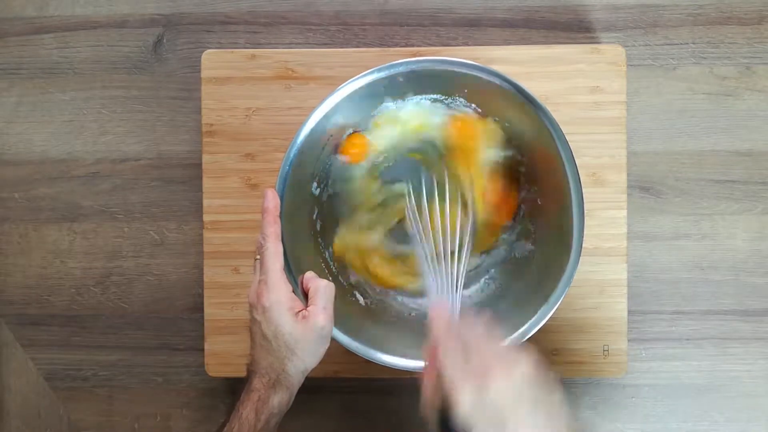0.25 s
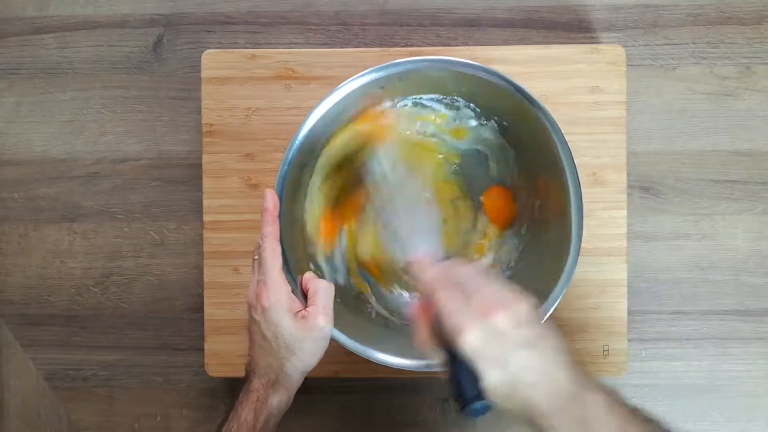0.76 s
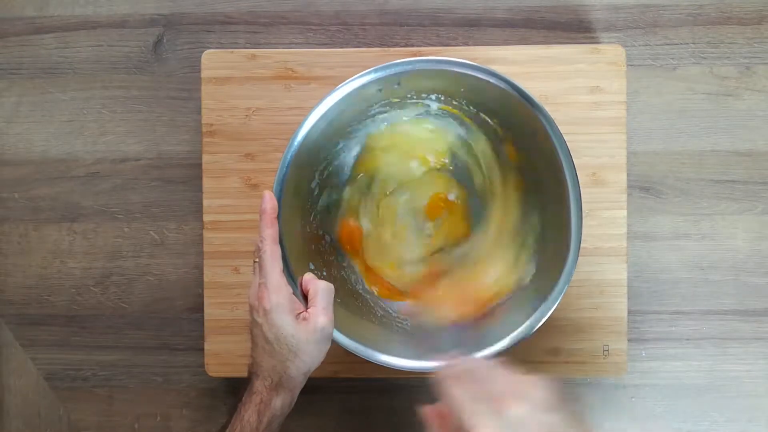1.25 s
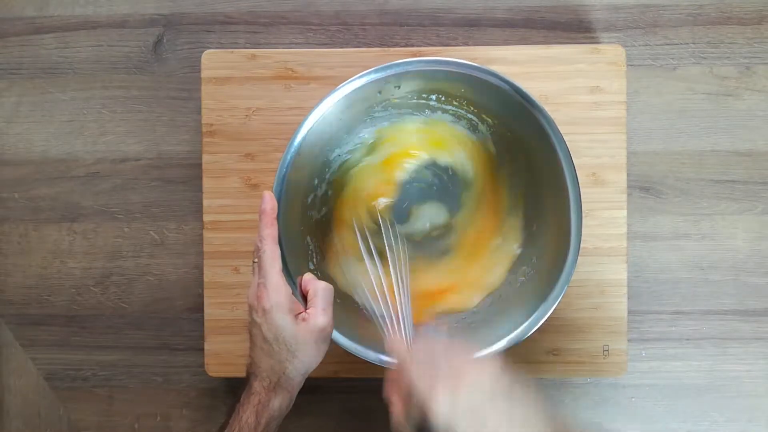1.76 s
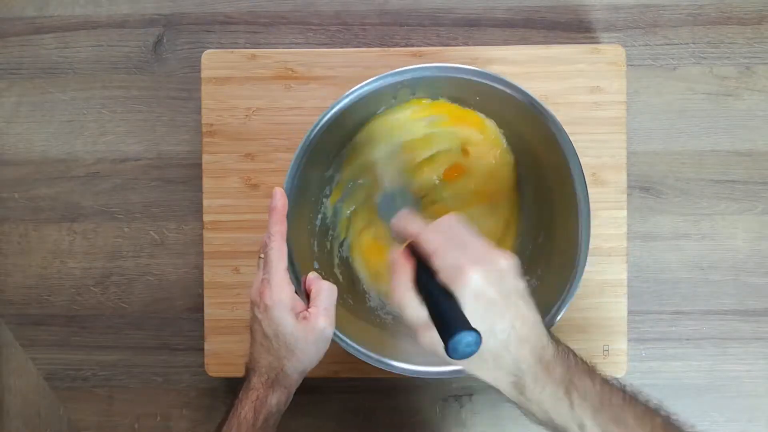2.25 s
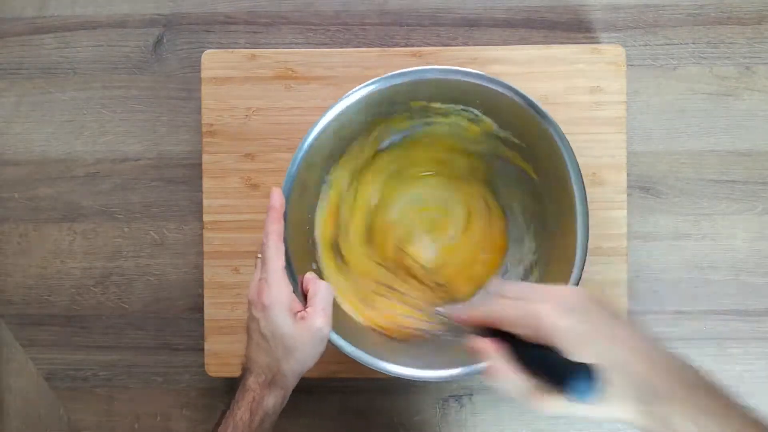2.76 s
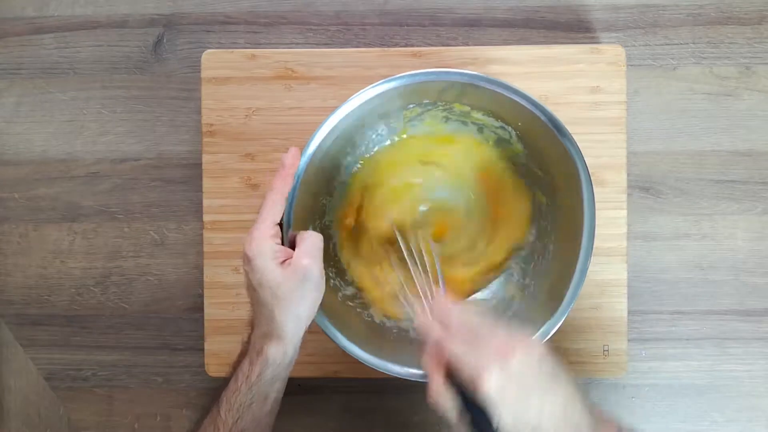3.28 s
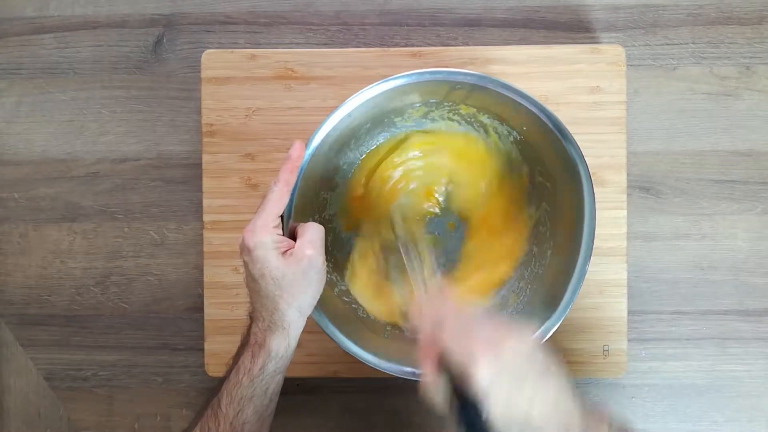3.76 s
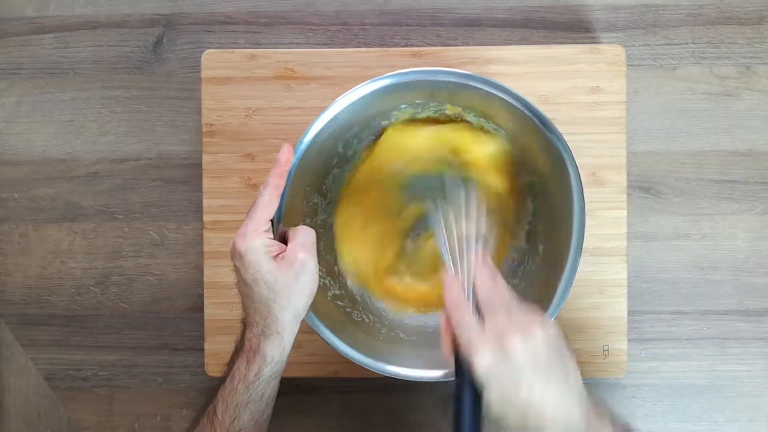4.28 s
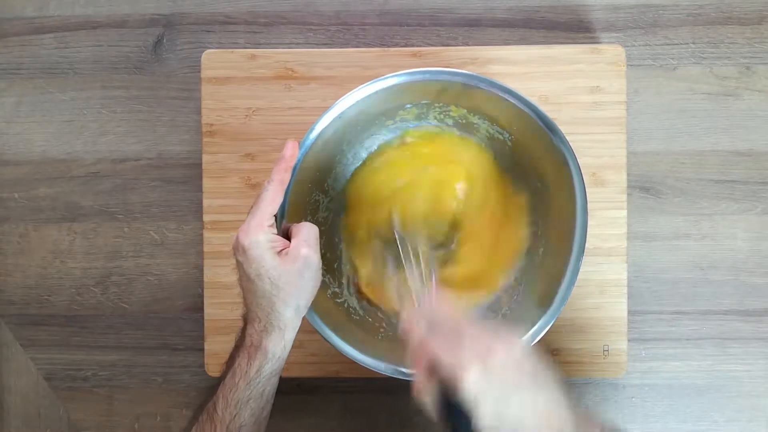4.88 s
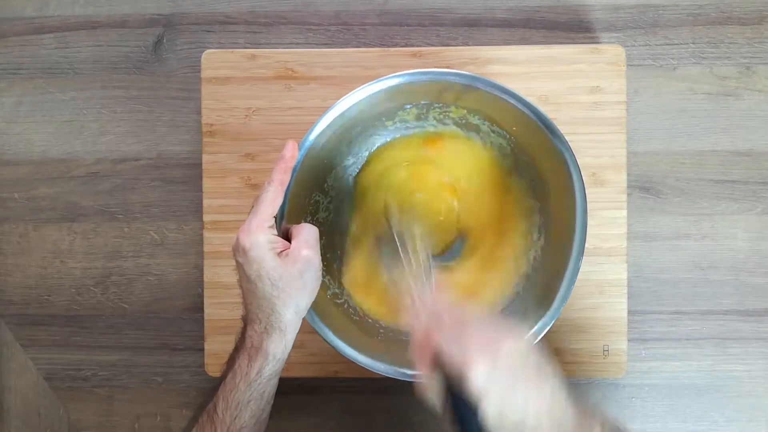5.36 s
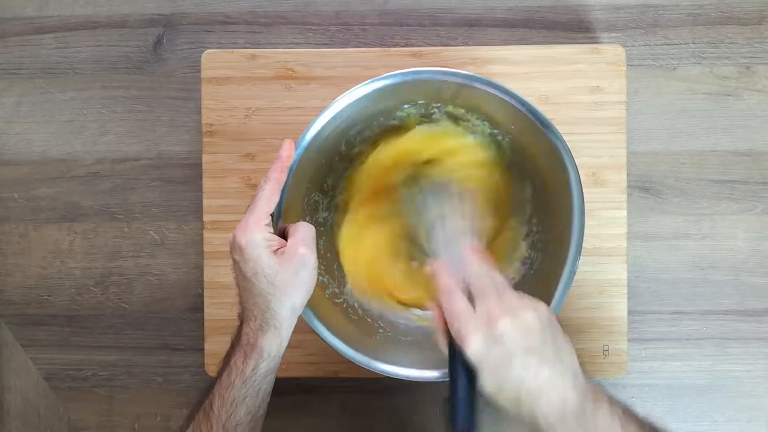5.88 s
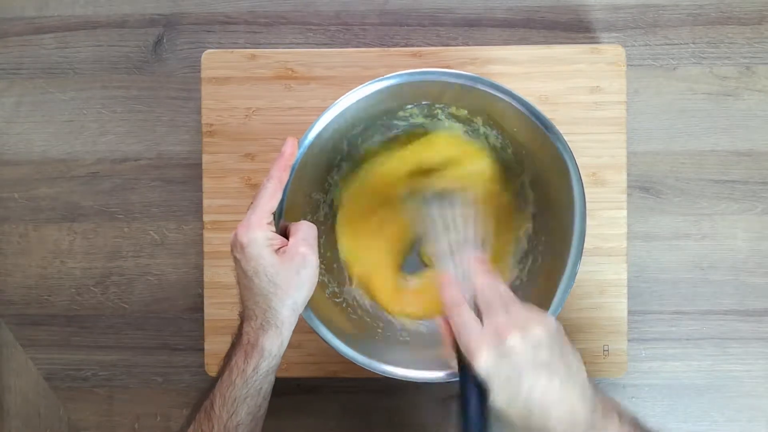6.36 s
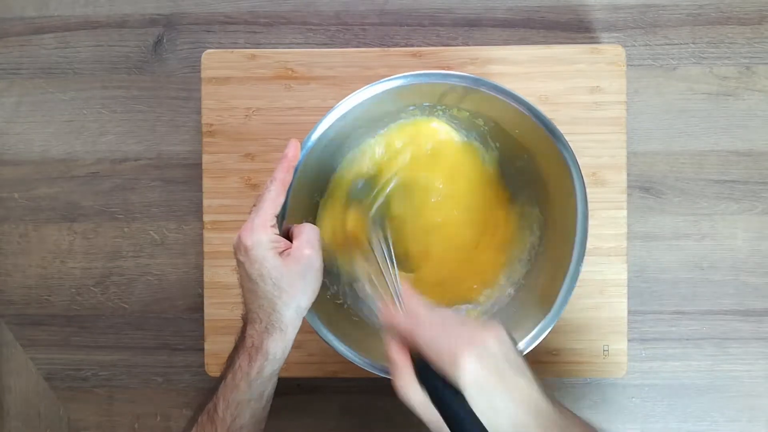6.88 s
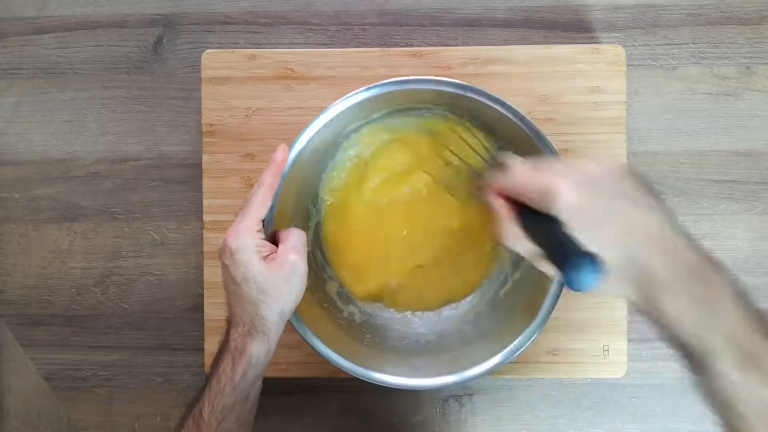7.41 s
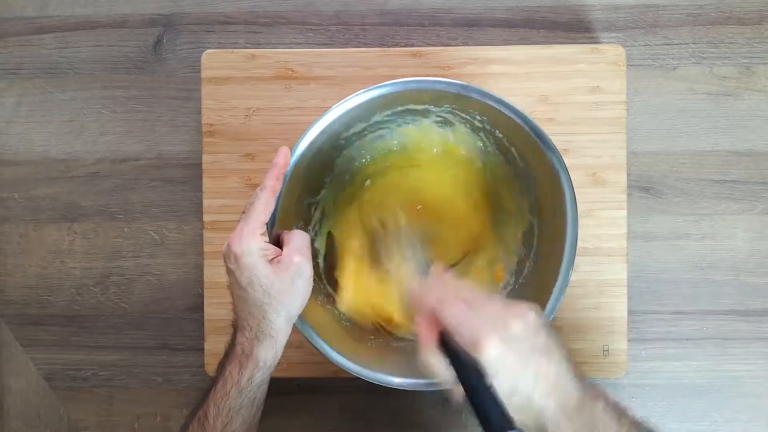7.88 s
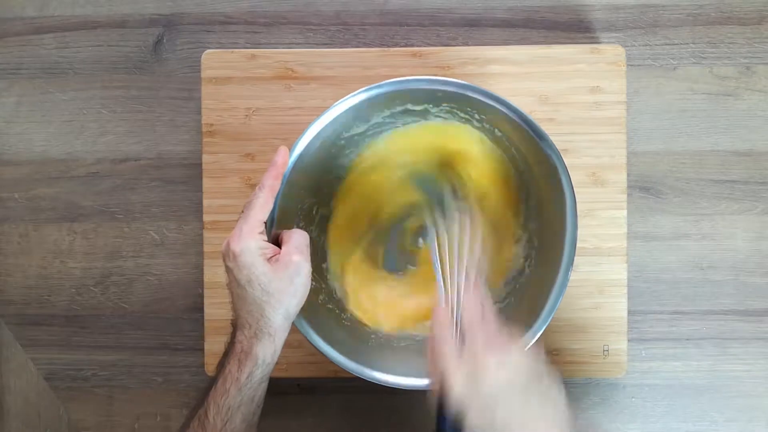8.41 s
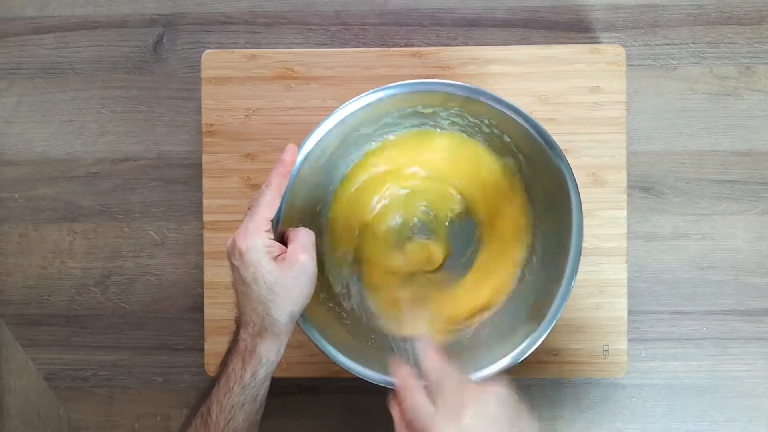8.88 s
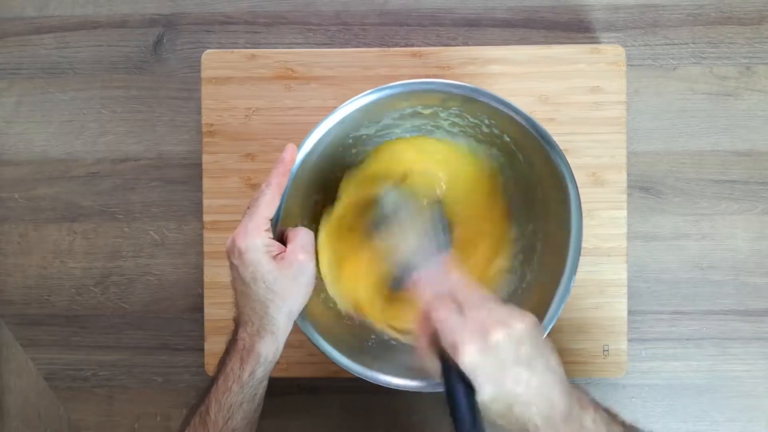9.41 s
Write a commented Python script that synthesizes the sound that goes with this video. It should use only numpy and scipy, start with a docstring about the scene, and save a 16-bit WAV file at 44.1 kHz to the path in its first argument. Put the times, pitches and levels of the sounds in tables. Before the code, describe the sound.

In a quiet, slightly echoing kitchen, a whisk works rapidly in a metal bowl near the microphone. Thin wires clatter and scrape throughout, mixed with squelching, hissing egg. Early strokes ring on bare steel over low worktop rumbles and thuds; midway the tone grows wetter and duller, then air pockets plop and sharper knocks strike the wall.

```python
"""A wire whisk beats eggs in a steel bowl on a wooden board in a kitchen, heard close up in stereo.
From the first stroke the wires skitter over the wet bottom and rasp up the bare wall, amid pops and hiss of egg.
Up to about 4 s dull thuds jar the board over a rumbling worktop; by 4.5 s egg coats and dulls the bottom.
From 6 s big air pockets plop; near 8 s hard knocks on the wall ring out and the worktop shakes again.
Contacts are click trains through bowl resonances and room echoes; egg is ringing pops and filtered noise."""
import sys
import numpy as np
from scipy import signal
from scipy.fft import rfft, irfft
from scipy.io import wavfile
from scipy.ndimage import uniform_filter1d

SR = 44100
rng = np.random.default_rng(int(sys.argv[2]) if len(sys.argv) > 2 else 0)


def wav_record(signal):
    """Record a signal, one row per channel, as 16-bit PCM in the file named by sys.argv[1]."""
    frames = np.transpose(np.atleast_2d(signal))
    bounded = np.clip(frames, -1, 1)
    # unit amplitude maps onto the largest positive 16-bit level
    quanta = np.round(bounded * 32767).astype(np.int16)
    wavfile.write(sys.argv[1], SR, quanta)


N = 425565
TIME = np.arange(N) / SR
TAIL = np.arange(2 ** 14) / SR   # seconds along a response
HZ = np.fft.rfftfreq(len(TAIL), 1 / SR)

# All levels are relative, ahead of the trims in the mix.
# colour of the quiet kitchen air: pitch_hz, density_db (per Hz)
AIR_COLOUR = [(30, -25), (150, -28), (500, -4), (1500, -7), (4500, -2), (9000, -18), (16000, -29)]
# rumble of the shaken worktop: pitch_hz, density_db (per Hz)
WORKTOP_COLOUR = [(20, -40), (31, -43), (40, -2), (49, 6), (60, 1.5), (70, -0.5), (88, -18.5), (140, -25.5),
                  (300, -24), (1500, -84)]
# how strongly the worktop shakes: time_s, level_db
WORKTOP_SHAKE = [(0.0, -58), (0.78, -70), (0.83, -57.5), (1.93, -53.5), (2.04, -72.5), (2.66, -45),
                 (2.82, -62.5), (3.52, -44.5), (3.89, -61), (4.3, -45.5), (4.41, -60.5), (7.87, -55.5),
                 (7.96, -40.5), (8.12, -61), (8.65, -53), (8.68, -44), (8.76, -56), (9.65, -56.5)]
# dull thuds of the board: start_s, level_db
BOARD_THUDS = [(.019, -48), (.121, -48), (0.869, -37.5), (1.181, -44.5), (1.469, -45.5), (1.755, -37),
               (1.855, -43), (2.506, -34), (2.645, -44.5), (3.028, -35.5), (3.554, -38.5), (4.234, -43)]
# colour of a thud: pitch_hz, density_db (per Hz)
THUD_COLOUR = [(20, -6), (55, 1), (95, -5), (135, 1.5), (270, -1.5), (350, -7.5), (600, -24), (2000, -65)]
# modes of the board under the bowl: pitch_hz, width_hz, level_db (over the thud colour)
BOARD_MODES = [(131, 6, 9), (241, 10, 9.5)]
# fizz of flung egg: pitch_hz, density_db (per Hz)
SPRAY_COLOUR = [(1000, -22), (5000, 7), (9000, 2), (16000, -3)]
# big air pockets bursting in the egg: start_s, level_db, pitch_hz (at the start)
EGG_PLOPS = [(6.049, -34, 990), (6.294, -41.5, 730), (6.521, -42.5, 713), (6.766, -43, 499),
             (6.983, -41.5, 505), (7.927, -35, 1060), (9.324, -32, 938)]
# contact noise on the wet bottom: pitch_hz, density_db (per Hz)
BOTTOM_COLOUR = [(120, -26.5), (330, -22), (520, -12.5), (790, -18), (980, -3), (1700, 4), (2700, 6.5),
                 (3600, 3.5), (5000, 3), (6500, -12.5), (9000, -13.5), (16000, -17.5)]
# bowl modes damped by egg and hand: pitch_hz, width_hz, level_db (over the contact noise)
BOWL_MODES = [(237.6, 12, 14.5), (515, 23, 11), (740, 31, 18), (920, 94, 10.5), (1179, 10, 9.5),
              (1404, 13.6, 9), (1620, 39, 5), (1867, 21, 5), (2170, 100, 0), (3590, 110, 4.5)]
# contact noise on the bare wall: pitch_hz, density_db (per Hz)
WALL_COLOUR = [(300, -30.5), (1200, -33), (2650, -22), (2950, -3), (4200, 1), (5400, 2), (6800, -2.5),
               (9000, -18.5), (16000, -29.5)]
# resonances of the upper wall: pitch_hz, width_hz, level_db (over the contact noise)
WALL_MODES = [(530, 44, 18.5), (1080, 62, 27.5), (1590, 52, 11)]
# ring of steel not yet coated by egg: pitch_hz, t60_s, level_db
BARE_STEEL_RING = [(525, 0.044, -13), (1410, 0.16, -15), (1570, 0.028, -14.5), (1634, 0.068, -13.5),
                   (3485, 0.045, -16), (3630, 0.073, -10.5), (3760, 0.081, -15)]
# how bare of egg the bottom is: time_s, level_db
BOTTOM_BARENESS = [(0, -1.5), (2.6, 1), (4.5, -12.5), (7.2, -11), (9.6, -5.5)]
# wires singing as they slip on the wall: pitch_hz, t60_s, level_db
WIRE_RING_MODES = [(3214, 0.32, -18), (3910, 0.078, -15.5), (4410, 0.036, -10), (4311, 0.09, -18.5),
                   (5080, 0.13, -19.5)]
# left-right balance of the bowl: pitch_hz, left_minus_right_db
BOWL_LEAN = [(100, 7), (300, -3.5), (1000, -1.5), (2000, -0.5), (4300, -5), (6000, -6), (8000, 5.5),
             (15000, 2)]
# how differently echoes reach the two sides: pitch_hz, side_minus_mid_db
ECHO_WIDTH = [(150, -43), (500, 3.5), (1000, -2.5), (2000, -3.5), (4000, 2)]
# pushes of the whisk, about five a second: start_s, push_s, drag_s (after it), bottom_db, wall_db
WHISK_STROKES = [(0, 0.059, 0.076, -46.5, -44.5), (.08, 0.096, 0.28, -42, -41.5),
                 (.26, 0.22, 0.065, -45.5, -41.5), (.455, 0.097, 0.45, -41, -38.5),
                 (.68, 0.14, 0.059, -45, -41.5), (0.872, 0.19, 0.14, -50, -41.5),
                 (1.006, 0.22, 0.1, -46, -46), (1.31, 0.19, 0.055, -45, -40), (1.6, 0.12, 0.95, -44, -45),
                 (1.86, 0.11, 0.31, -41.5, -39), (2.09, 0.17, 0.22, -43, -44),
                 (2.294, 0.19, 0.029, -45, -44), (2.59, 0.016, 0.11, -47.5, -37.5),
                 (2.675, 0.13, 0.15, -50.5, -37.5), (2.886, 0.046, 0.092, -46, -51),
                 (3.077, 0.032, 0.1, -47.5, -40.5), (3.189, 0.044, 0.1, -45.5, -49),
                 (3.345, 0.073, .1, -50, -62), (3.475, 0.086, 0.24, -47, -45),
                 (3.68, 0.071, 0.24, -43.5, -40.5), (3.84, 0.15, 0.43, -43.5, -41),
                 (4.05, 0.23, 0.3, -45, -42.5), (4.29, 0.26, 0.14, -45.5, -42),
                 (4.59, 0.047, 0.25, -39, -37.5), (4.815, 0.059, 0.1, -40.5, -36),
                 (4.95, 0.056, .05, -44, -37.5), (5.04, 0.064, 0.2, -40.5, -36.5),
                 (5.275, 0.07, 0.14, -42, -36.5), (5.5, 0.064, 0.17, -44, -36),
                 (5.728, 0.072, 0.073, -37, -35), (5.87, 0.058, 0.16, -44.5, -43.5),
                 (5.975, 0.085, 0.45, -41, -42.5), (6.21, 0.074, 0.16, -45, -41),
                 (6.425, 0.063, 0.18, -39.5, -38), (6.65, 0.1, 0.34, -40.5, -38.5),
                 (6.885, 0.054, 0.1, -41, -34.5), (7.03, 0.11, 0.12, -45, -42.5),
                 (7.235, 0.077, 0.082, -45, -33), (7.36, 0.069, 0.13, -46.5, -36.5),
                 (7.695, 0.21, 0.079, -49.5, -30), (7.914, 0.084, 0.22, -43.5, -40.5),
                 (8.08, 0.13, 0.24, -50.5, -44), (8.215, 0.14, 0.17, -43, -44),
                 (8.42, 0.07, 0.61, -39, -37.5), (8.655, 0.063, 0.28, -38, -38),
                 (8.85, .09, 0.23, -38.5, -38), (9.085, 0.042, 0.52, -41.5, -38.5),
                 (9.2, 0.034, 0.14, -48, -35), (9.3, 0.053, 0.23, -40, -43), (9.489, 0.14, .2, -41, -45.5)]
# hard knocks of whisk on steel: start_s, chatter_s, bottom_db, wall_db
WHISK_KNOCKS = [(.346, 0.01, -28, -28), (0.698, 0.012, -39, -29), (0.771, 0.015, -37, -58),
                (1.125, 0.014, -37.5, -51), (1.342, 0.0097, -52, -30.5), (1.734, 0.007, -34, -54),
                (2.058, 0.013, -33, -44), (2.3, 0.0066, -30.5, -34), (2.333, 0.016, -53, -23),
                (2.681, 0.0044, -53, -28), (2.776, 0.0099, -47, -43), (2.889, 0.0085, -40, -30.5),
                (3.476, 0.0053, -37, -40), (3.499, 0.0052, -34, -29.5), (3.78, 0.0037, -29, -44),
                (3.854, 0.0056, -37, -26.5), (4.148, 0.026, -39, -34.5), (4.644, 0.0042, -29.5, -34),
                (4.745, 0.0085, -47, -32.5), (5.152, 0.0031, -28.5, -26), (5.277, 0.0088, -37, -39),
                (5.344, 0.0028, -50, -47), (5.909, 0.0066, -35, -57), (5.978, 0.019, -33.5, -33),
                (6.213, 0.0084, -31.5, -32.5), (6.59, 0.014, -48, -33), (6.747, 0.0044, -30, -38),
                (6.913, 0.0039, -42, -35), (7.023, 0.0073, -35, -34), (7.053, 0.0036, -56, -31),
                (7.088, 0.0053, -45, -27.5), (7.15, 0.0044, -41, -51), (7.269, 0.037, -59, -30),
                (7.361, 0.0058, -48, -27), (7.444, 0.0077, -39.5, -31.5), (7.642, 0.051, -46, -41.5),
                (7.754, 0.0046, -45, -28.5), (7.804, 0.0059, -39.5, -24.5), (7.854, 0.015, -60, -19.5),
                (7.936, 0.0022, -41, -20), (8.307, 0.0042, -29.5, -37), (8.39, 0.009, -36.5, -48),
                (8.659, 0.013, -29.5, -36), (9.092, 0.01, -31, -52), (9.218, 0.011, -56, -29),
                (9.329, 0.0069, -30, -47), (9.499, 0.029, -31.5, -36), (9.626, .023, -48, -21)]

ROOM_T60_S, ROOM_DB = 0.35, -7.5   # kitchen reverberation; level against the bowl's ring
CUTOFF_HZ = 15900
THUD_RISE_S = 0.0035   # the hand cushions each thud
PLOP_DB, PLOP_CYCLES = 0.5, 71   # trim, and cycles for a plop to fall 60 dB
FULL_SPRAY_DB, SPRAY_LOSS = -39.5, 1.0   # strokes lighter than this on the bottom fling less egg (dB per dB)
ATTACK_SHARE = 0.25   # share of a push in which it swells
RELEASE_S, DRAG_DB = 0.013, -5   # letting go, then a lighter drag against the push
# loose wires tap at random: rate, level against the stroke, spread, chatter
TAPS_PER_S, TAP_DB, TAP_SPREAD_DB, TAP_S = 16, 2.5, 3, 0.0037


def from_db(db):
    """Decibels to gain."""
    return 10 ** (np.asarray(db) / 20)


def rms_one(x):
    """Scale to an rms of 1."""
    return x / np.sqrt(np.mean(x ** 2) + 1e-20)


def unit(x):
    """Scale each channel to an energy of 1."""
    return x / np.sqrt(np.sum(x ** 2, axis=-1, keepdims=True) + 1e-20)


def add(out, sound, start):
    """Mix a sound in from a given sample on."""
    first, last = max(start, 0), min(start + sound.shape[-1], N)
    out[..., first:last] += sound[..., first - start:last - start]


def in_time(rows):
    """Each column of a curve at every sample."""
    s, *columns = np.transpose(rows)
    return [np.interp(TIME, s, c) for c in columns]


def gain_by_hz(points):
    """A spectrum as gains on the frequency grid of a response."""
    hz, db = np.transpose(points)
    return from_db(np.interp(np.log(HZ + 1), np.log(hz), db))


def causal(gain):
    """The minimum-phase filter with these gains: nothing sounds early."""
    cepstrum = irfft(np.log(gain + 1e-9))
    half = len(TAIL) // 2
    cepstrum[..., 1:half] *= 2
    cepstrum[..., half + 1:] = 0
    return np.exp(rfft(cepstrum))


def body(colour, modes):
    """Gains of a broad colour with resonances standing out of it; rms 1."""
    peaks = 0
    for hz, width, db in modes:
        peaks = peaks + from_db(db) ** 2 / (1 + (2 * (HZ - hz) / width) ** 2)
    return rms_one(gain_by_hz(colour) * np.sqrt(1 + peaks))


def through(x, response):
    """Play a signal through a response."""
    x, response = (np.atleast_2d(v).astype(np.float32) for v in (x, response))
    return signal.oaconvolve(x, response, axes=-1)[:, :N]


def coloured(x, colour):
    """Filter by a spectrum, keeping the power of white noise."""
    return through(x, unit(irfft(causal(gain_by_hz(colour)))))


def dying_noise(t60):
    """A dense stereo ring of unit energy."""
    return unit(rng.standard_normal((2, len(TAIL))) * from_db(-60 * TAIL / t60))


def with_echo(x, echo_db):
    """A sound heard direct, followed by its stereo echo."""
    direct = 1.0 * (TAIL == 0)
    return through(x, direct + from_db(echo_db) * dying_noise(ROOM_T60_S))


def skitter(size, per_s, spread_db, even_s):
    """Stick-slip contacts of very unequal size whose short-term power stays near 1."""
    sizes = from_db(spread_db * np.minimum(rng.exponential(1, size), 5))
    clicks = (rng.random(size) < per_s / SR) * sizes * rng.choice([-1, 1], size)
    power = np.abs(uniform_filter1d(clicks ** 2, int(even_s * SR)))
    return clicks / np.sqrt(power + 1e-6)


def kitchen_air(level_db):
    """Steady stereo noise with the colour of the quiet kitchen."""
    return from_db(level_db) * coloured(rng.standard_normal((2, N)), AIR_COLOUR)


def worktop(thud_t60, thud_db, shake_db):
    """The table shakes at its low resonances and now and then the board gives a dull, juddering thud."""
    force, t = np.zeros(N), np.arange(SR // 2) / SR
    for s, db in BOARD_THUDS:
        thud = from_db(db - 60 * t / thud_t60) * (1 - np.exp(-t / THUD_RISE_S))
        add(force, thud, round(s * SR))
    judder = force * skitter(N, per_s=340, spread_db=2.5, even_s=0.024)
    thuds = through(judder, unit(irfft(causal(body(THUD_COLOUR, BOARD_MODES)))))
    rumble = rms_one(coloured(rng.standard_normal(N), WORKTOP_COLOUR))
    rumble /= np.sqrt(uniform_filter1d(rumble ** 2, int(.15 * SR)) + 0.19)   # evens out its swells
    return from_db(thud_db) * thuds + from_db(in_time(WORKTOP_SHAKE)[0] + shake_db) * rumble


def flung_egg(spray, level_db):
    """Egg torn to spray hisses: noise that follows the strength of the contacts."""
    return from_db(level_db) * coloured(spray * rng.standard_normal((2, N)), SPRAY_COLOUR)


def egg(stirring, per_s, cycles, low_hz, high_hz, level_db, count):
    """Air pockets torn open by the wires pop, each ringing briefly at one of several pitches."""
    sizes = from_db(1.4 * np.minimum(rng.exponential(1, N), 3))
    pops = (rng.random(N) < per_s / SR) * sizes * stirring
    dealt, out = rng.integers(0, count, N), np.zeros(N)
    for k, hz in enumerate(np.geomspace(low_hz, high_hz, count)):
        r = from_db(-60 * hz / (cycles * SR))   # falls 60 dB in this many cycles
        w = 2 * np.pi * hz / SR
        resonator = [1, -2 * r * np.cos(w), r * r]
        out += signal.lfilter([1, -1], resonator, pops * (dealt == k) + 1e-18)
    return from_db(level_db) * with_echo(out, echo_db=-2.5)


def plops(rise=0.03):
    """Each big bubble rings briefly, rising a little in pitch, and echoes in the bowl."""
    out = np.zeros(N)
    for s, db, hz in EGG_PLOPS:
        age = np.minimum(TAIL * hz / PLOP_CYCLES, 2)
        tone = np.sin(2 * np.pi * hz * TAIL * (1 + rise * age))
        add(out, from_db(db + PLOP_DB - 60 * age) * tone, round(s * SR))
    return with_echo(out, echo_db=-5)


def push(t, length, drag_s):
    """Force of one stroke: it rises, holds, then falls back to a light drag until the wires lift off."""
    after = np.maximum(t - length, 0)
    drag = from_db(DRAG_DB) * np.exp(-(after / drag_s) ** 2)
    swell = np.clip(t / (ATTACK_SHARE * length), 0, 1)
    return swell * np.maximum(np.exp(-after / RELEASE_S), drag)


def pressure(t, length):
    """Force of one knock: the wires land quickly, then slide off; longer chatter sets in more softly."""
    landing_s = 0.00022 + 0.14 * length ** 2 / (length + 0.034)
    landing = .5 + .5 * np.tanh(t / landing_s)
    return np.sqrt(landing * np.exp(-(np.maximum(t, 0) / length) ** 2))


def loose_taps(size=256):
    """Light knocks at random moments, each about as strong as the stroke it falls in."""
    starts, lengths, drags, bottom_db, wall_db = np.transpose(WHISK_STROKES)
    times = (np.arange(size) + rng.random(size)) / TAPS_PER_S
    chance = rng.standard_normal((size, 2))
    taps = []
    for s, luck in zip(times[times < TIME[-1]], chance):
        k = max(np.searchsorted(starts, s) - 1, 0)
        force = push(s - starts[k], lengths[k], drags[k])
        db = TAP_DB + TAP_SPREAD_DB * luck + 20 * np.log10(force + 1e-3)
        taps.append((s, TAP_S, bottom_db[k] + db[0], wall_db[k] + db[1] - 1.5))
    return taps


def contacts(wettest_db=-39.0, wall_spray_db=5, spray_follows=1.04, first_hit_db=20, count=2):
    """Click trains on bottom and wall, how hard the egg is stirred, and how much is torn to spray."""
    t = np.arange(-SR // 50, SR * 3 // 4) / SR
    brief = t[:SR // 8]
    clicks, stirring, spray_power = np.zeros((count, N)), np.zeros(N), np.zeros(N)

    def add_contact(s, force, slips, bottom_db, wall_db, flung):
        """Share one contact between bottom, wall and egg; pressing very hard throws no more spray."""
        start = round((s + t[0]) * SR)
        add(clicks, from_db([[bottom_db], [wall_db]]) * slips, start)
        add(stirring, from_db(bottom_db) * force, start)
        spray_db = min(max(bottom_db, wall_db + wall_spray_db), wettest_db)
        add(spray_power, (from_db(spray_db) * flung) ** 2, start)

    for s, length, drag_s, bottom_db, wall_db in WHISK_STROKES:
        force = push(t, length, drag_s)
        slips = force * skitter(len(t), per_s=1500, spread_db=3.5, even_s=.018)
        flung = force ** spray_follows * from_db(min(bottom_db - FULL_SPRAY_DB, 0) * SPRAY_LOSS)
        add_contact(s, force, slips, bottom_db, wall_db, flung)
    for s, length, bottom_db, wall_db in [*WHISK_KNOCKS, *loose_taps()]:
        force = pressure(brief, length)
        slips = force * skitter(len(brief), per_s=2100, spread_db=1.5, even_s=0.018)
        # a short touch starts with a hard hit
        slips[brief == 0] += from_db(first_hit_db) / (1 + (length / 0.011) ** 2)
        slips = unit(slips) * np.linalg.norm(force)
        add_contact(s, force, slips, bottom_db, wall_db, from_db(-31) * force)
    return clicks, stirring, np.sqrt(spray_power)


def echoes(ring_t60, crack_db):
    """Stereo transfer from one spot of steel: a crack, a dense ring inside the bowl, then the kitchen."""
    room = unit(dying_noise(ROOM_T60_S) * (1 - np.exp(-TAIL / 0.0014)))
    mid, side = rfft(dying_noise(ring_t60) + from_db(ROOM_DB) * room)
    width, lean = gain_by_hz(ECHO_WIDTH), np.sqrt(gain_by_hz(BOWL_LEAN))
    both = (mid + side * width * [[1], [-1]]) / np.sqrt(1 + width ** 2)
    both = both + from_db(crack_db)   # a flat spectrum is a click at once
    return both * [lean, 1 / lean] / np.sqrt(1 + from_db(crack_db) ** 2 + from_db(ROOM_DB) ** 2)


def travel(clicks, gain, ring_t60, uneven_db, hops_per_s, count=13):
    """The moving wires hop from one spot of the steel to the next; each spot favours other modes."""
    knots = np.geomspace(300, 16000, num=48)   # Hz
    spread_db = uneven_db * (1000 / knots) ** 0.28
    favour = from_db(spread_db * rng.standard_normal((count, len(knots))))
    favour /= np.sqrt(np.mean(favour ** 2, axis=0))   # all spots together give the colour of the whole bowl
    where = np.cumsum(rng.random(N) < hops_per_s / SR) % count
    out = np.zeros((2, N))
    for k in range(count):
        own = rms_one(gain * gain_by_hz(np.c_[knots, 20 * np.log10(favour[k])]))
        response = irfft(echoes(ring_t60, crack_db=-7.5) * causal(own))
        out += through(clicks * (where == k), response)
    return out


def ringing(clicks, modes):
    """Contacts set fixed modes ringing, each pushing or pulling by chance; the ears hear them out of step."""
    lean = np.sqrt(gain_by_hz(BOWL_LEAN))
    phase_by_hz = np.arctan(gain_by_hz(ECHO_WIDTH))
    response = 0
    for hz, t60, db in modes:
        side = np.interp(hz, HZ, lean)
        apart = np.interp(hz, HZ, phase_by_hz) * np.array([[1], [-1]])
        wave = np.sin(2 * np.pi * hz * TAIL + apart + rng.uniform(0, 2 * np.pi))
        ring = unit(wave * from_db(-60 * TAIL / t60))
        response = response + from_db(db) * np.array([[side], [1 / side]]) * ring
    return through(clicks * rng.choice([-1, 1], N), response)


def whisk(on_bottom, on_wall):
    """The wet bottom answers with a damped clatter, the bare wall with a bright rasp; steel and wires ring on."""
    bottom_body, wall_body = body(BOTTOM_COLOUR, BOWL_MODES), body(WALL_COLOUR, WALL_MODES)
    bottom = travel(on_bottom, bottom_body, ring_t60=0.023, uneven_db=4.0, hops_per_s=110)
    wall = travel(on_wall, wall_body, ring_t60=0.056, uneven_db=4.0, hops_per_s=110)
    steel = from_db(in_time(BOTTOM_BARENESS)[0]) * ringing(on_bottom, BARE_STEEL_RING)
    wires = ringing(on_wall, WIRE_RING_MODES)
    return from_db(3.0) * bottom + from_db(-1.0) * wall + steel + wires


def scene():
    """The whisk, egg and worktop over the quiet air of the kitchen."""
    clicks, stirring, spray = contacts()
    air = kitchen_air(level_db=-52.5)
    table = worktop(thud_t60=0.47, thud_db=-6.5, shake_db=1.5)
    hiss = flung_egg(spray, level_db=-4.5)
    slosh = egg(stirring, per_s=45, cycles=24, low_hz=481, high_hz=587, level_db=-12.5, count=5)
    squelch = egg(stirring, per_s=51, cycles=26, low_hz=870, high_hz=2650, level_db=-8.5, count=14)
    return air + table + hiss + slosh + squelch + plops() + whisk(*clicks)


def record(dry):
    """At the microphone the treble is cut steeply above the cutoff."""
    lowpass = signal.ellip(12, .1, 80, CUTOFF_HZ, fs=SR, output="sos")
    return signal.sosfilt(lowpass, dry)


dry = scene()
out = record(dry)
wav_record(out)
```